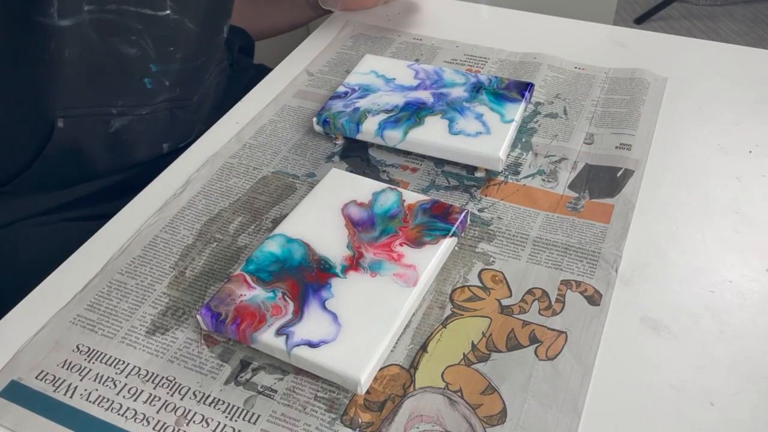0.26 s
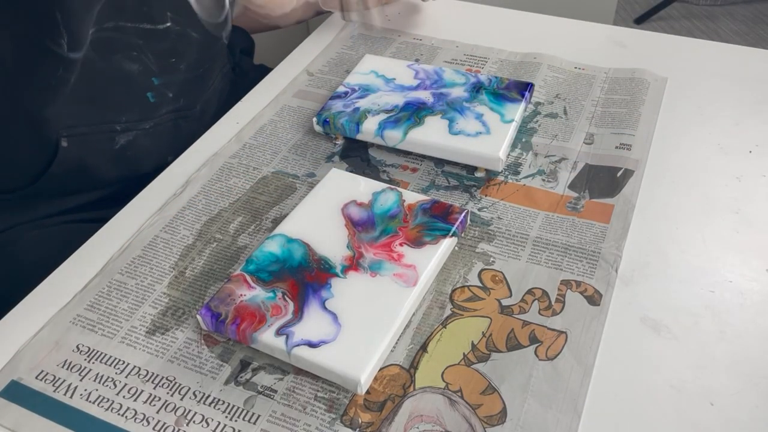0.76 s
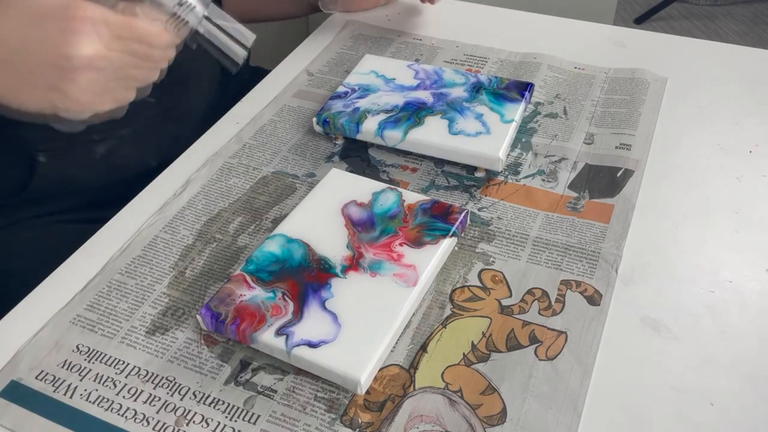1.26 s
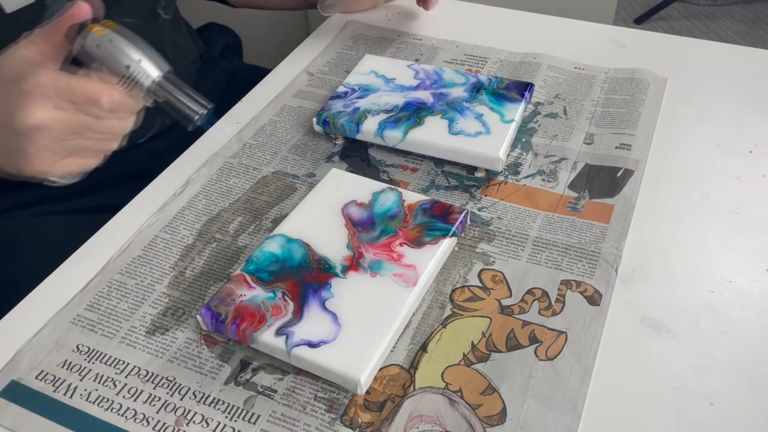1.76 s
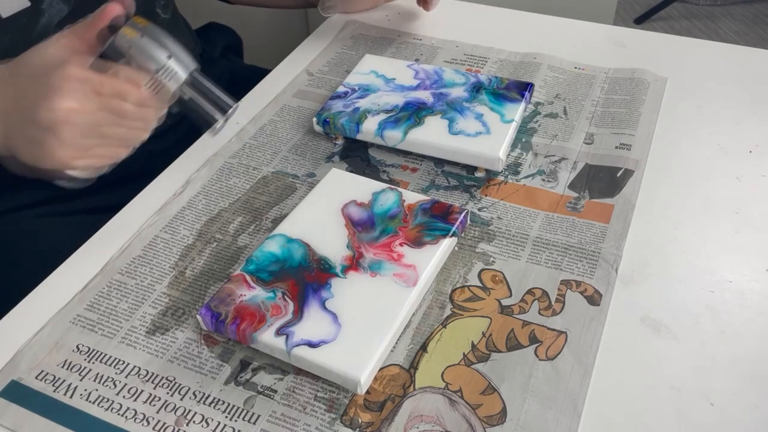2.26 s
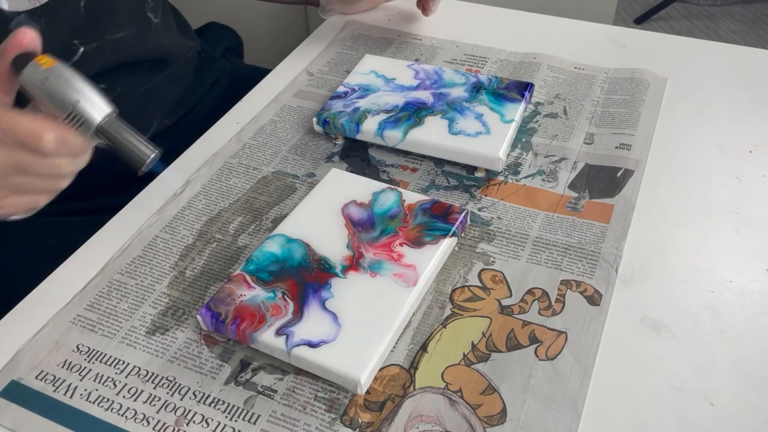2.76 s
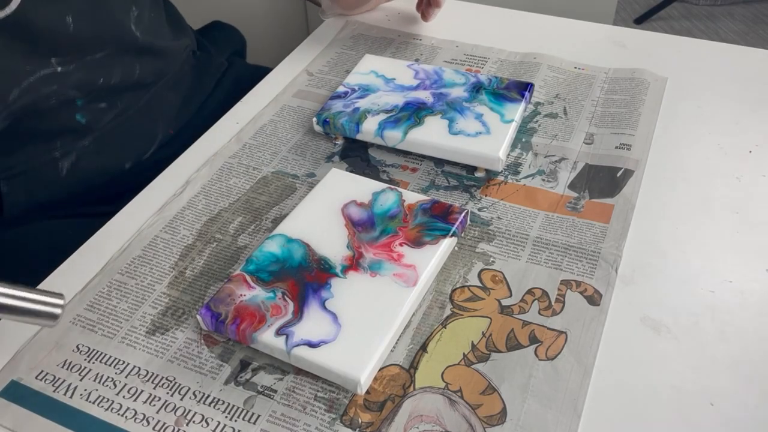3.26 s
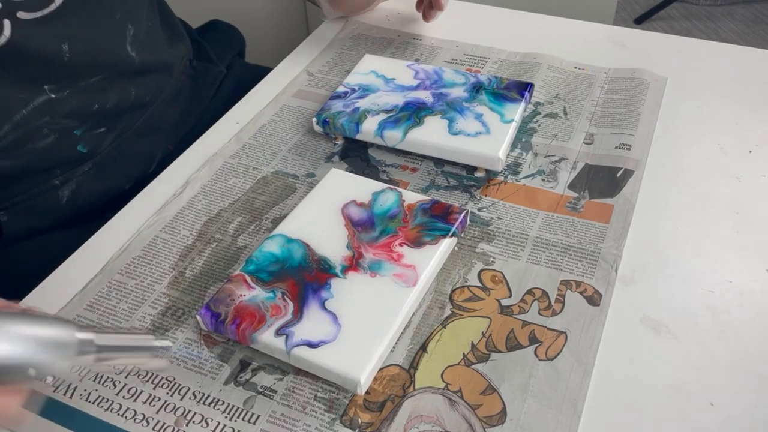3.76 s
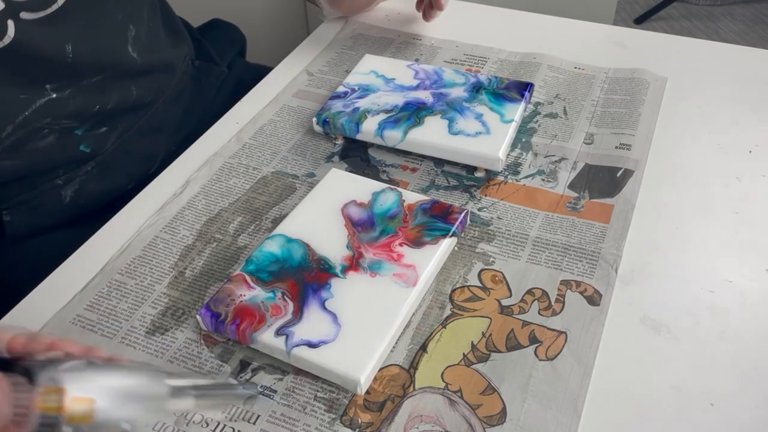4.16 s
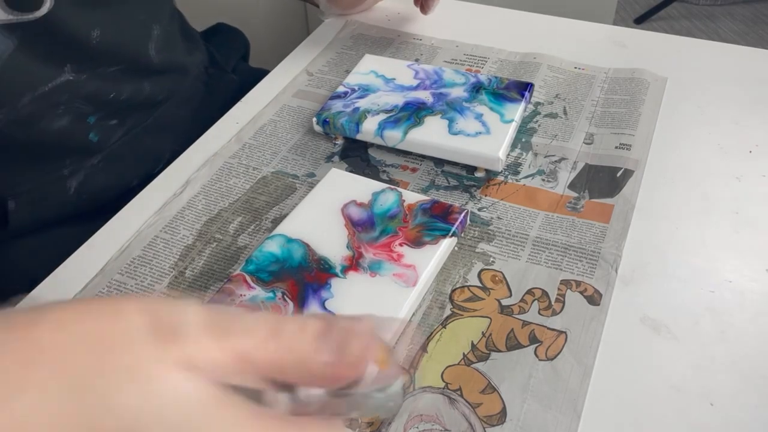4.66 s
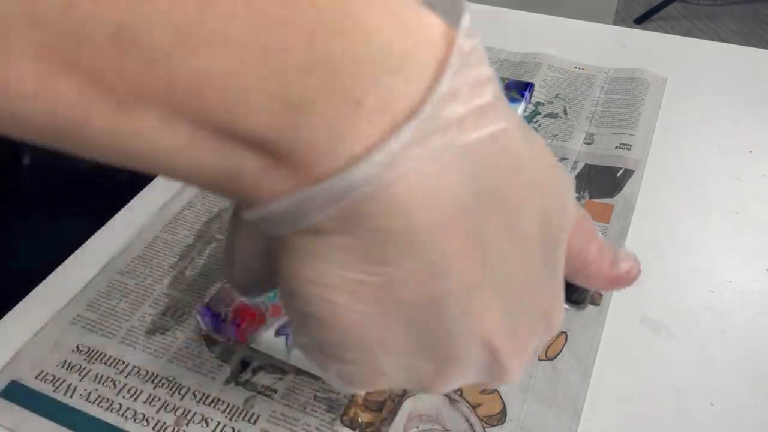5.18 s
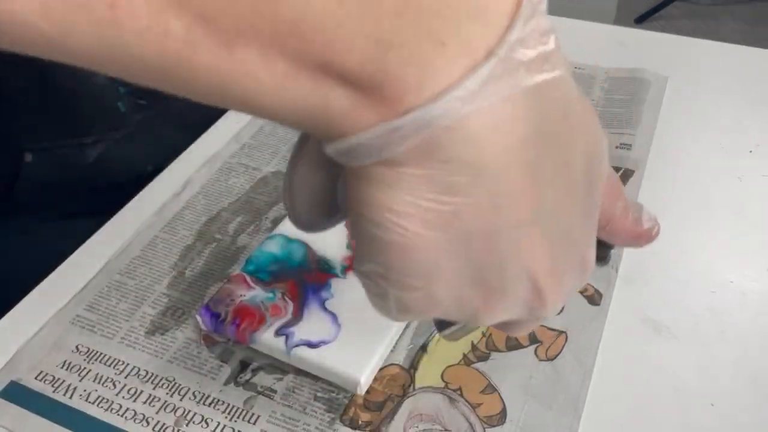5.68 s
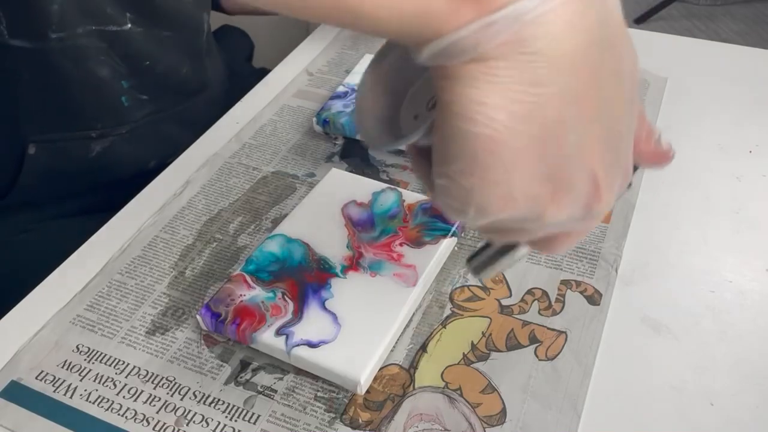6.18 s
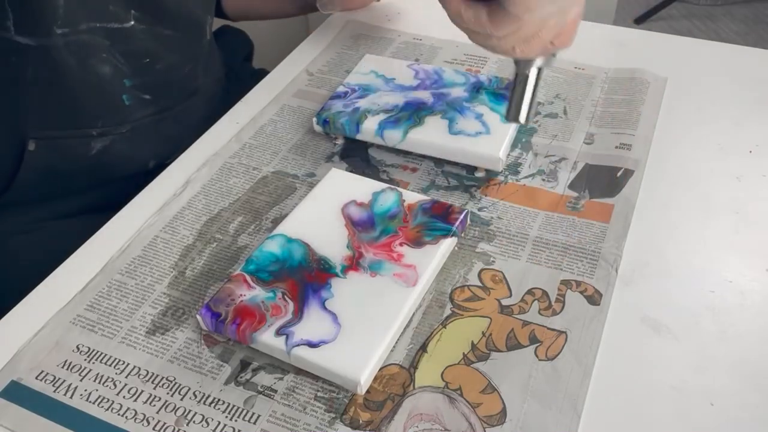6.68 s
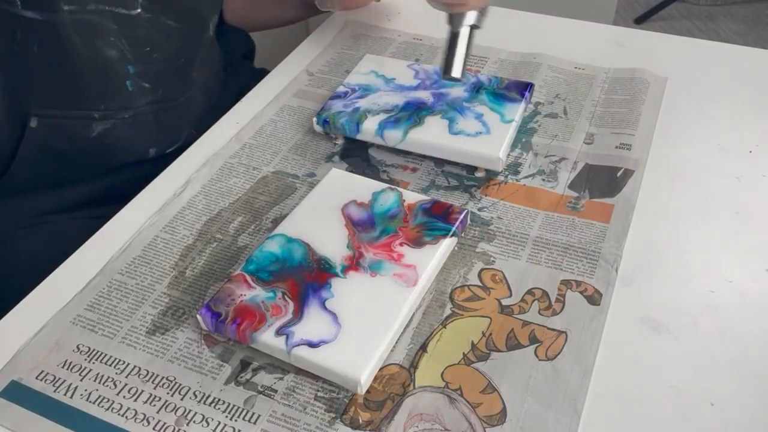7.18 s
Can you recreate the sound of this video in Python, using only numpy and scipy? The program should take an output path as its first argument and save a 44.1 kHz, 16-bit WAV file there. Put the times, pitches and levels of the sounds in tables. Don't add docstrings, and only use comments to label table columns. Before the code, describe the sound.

Handheld torch flame hisses in fluttering puffs, stops with small plastic ticks, then cracks back alight, four times over, with short room reverberation.

```python
import sys
import numpy as np
from scipy import signal
from scipy.fft import rfft, irfft, next_fast_len
from scipy.io import wavfile
from scipy.ndimage import uniform_filter1d, map_coordinates

SR = 44100
rng = np.random.default_rng(int(sys.argv[2]) if len(sys.argv) > 2 else 0)


def natural_amplitude(level_db):
    exponent = np.asarray(level_db, float) / 20
    return 10 ** exponent


def to_wav(sig):
    pcm = np.clip(np.atleast_2d(sig), -1, 1) * 32767
    pcm = np.round(pcm).astype(np.int16)
    wavfile.write(sys.argv[1], SR, pcm.T)


N = 327663

# (time [s], peak [dB], grip pitch [Hz], brightest pitch [Hz], top edge [dB])
SNAPS = [
    (1.5294, -2, 3000, 8550, -21),
    (3.326, -2.5, 2190, 7580, -13),
    (5.0008, -1, 1570, 10930, -16),
    (6.912, -2, 2250, 6540, -9.5),
]
# (frequency [Hz], width [Hz], level [dB])
GRIP = [(800, 2600, -8.5), (1860, 760, 2.5), (2250, 360, 3.5), (2860, 530, -2.5)]


def unit(x):
    return x / np.sqrt(np.mean(x ** 2) + 1e-20)


def along(points, hz):
    f, v = np.transpose(points)
    return np.interp(np.log(hz + 1), np.log(f + 1), v)


def wobble(rate):
    knots = rng.standard_normal(int(N * rate / SR) + 4)
    return map_coordinates(knots, [np.arange(N) * rate / SR])


def filtered(x, response):
    m = next_fast_len(N + SR // 2)
    return irfft(rfft(x, m) * response(np.fft.rfftfreq(m, 1 / SR)), m)[:N]


def resonant(x, modes):
    def response(f):
        total = 0
        for k, (centre, width, db) in enumerate(modes):
            damping = 1j * f * width
            total = total + (-1) ** k * natural_amplitude(db) * damping / (centre * centre - f * f + damping)
        return total
    return filtered(x, response)


def rush(spectrum, flutter_db, rate):
    turbulence = rng.standard_normal(N) * natural_amplitude(flutter_db * wobble(rate))
    return unit(filtered(turbulence, lambda hz: natural_amplitude(along(spectrum, hz))))


def gate(start, end, rise, fall):
    t = np.arange(N) / SR
    swell = 1 - np.exp(-np.clip(t - start, 0, 9) / rise)
    return swell * natural_amplitude(-60 * np.clip(t - end, 0, 9) / fall)


def played(laws, rise, fall):
    # (time [s], flame strength [dB], nozzle turned toward the microphone [dB])
    burns = [
        [(0, -45.5, 3), (.3, -43, 2.5), (.6, -44.5, 2.5), (.9, -44.5, 2)],
        [(1.75, -42, 0.5), (2.1, -42.5, -1), (2.5, -43, 0), (2.825, -40.5, -1.5)],
        [(3.55, -41, 0), (3.95, -42, 0.5), (4.37, -42, 0)],
        [(5.22, -41, 1.5), (5.7, -41.5, 0.5), (5.95, -40.5, -0.5), (6.53, -41.5, 2.5)],
        [(7.13, -42.5, 0.7), (7.43, -42, 3)],
    ]
    # (time [s], change [dB], half length [s])
    flares = [(0.027, 6, 0.035), (0.429, -4.5, 0.028), (0.465, 6.5, 0.029), (0.628, 4, 0.016),
              (0.72, -1, 0.028), (.778, 0, .02), (2.52, 1.5, 0.031), (2.805, -3, 0.023), (3.746, -2, 0.067),
              (5.831, 2, .05)]
    usual_db, drifts_per_s = -42, 9
    t = np.arange(N) / SR
    s, strength_db, turn_db = np.transpose(sum(burns, []))
    swing = np.interp(t, s, strength_db) - usual_db
    for at, db, half in flares:
        swing = swing + db * np.exp(-((t - at) / half) ** 2)
    starts = [-1] + [row[0] for row in SNAPS]
    lit = sum(gate(start, rows[-1][0], rise, fall) for start, rows in zip(starts, burns))
    turning = np.interp(t, s, turn_db)
    return [lit * natural_amplitude(usual_db + db + follows * swing + faces * turning + drift_db * wobble(drifts_per_s))
            for db, follows, faces, drift_db in laws]


def bursts(times, levels_db, t60s, rises, pitches_hz=None):
    out, t = np.zeros(N + SR), np.arange(SR // 4) / SR
    for k, (s, db, t60, rise) in enumerate(np.broadcast(times, levels_db, t60s, rises)):
        grit = rng.standard_normal(len(t))
        if pitches_hz is not None:
            slow = uniform_filter1d(grit + 0.37, size=40)
            grit = unit(slow * np.sin(2 * np.pi * pitches_hz[k] * t))
        shape = (1 - np.exp(-t / max(rise, 1e-4))) * natural_amplitude(db - 60 * t / max(t60, .002))
        out[round(s * SR):][:len(t)] += shape * grit
    return out[:N]


def blows(times, levels_db):
    out = np.zeros(N)
    out[np.round(times * SR).astype(int)] = natural_amplitude(levels_db)
    return out


def patchy(x, depth_db):
    z = signal.stft(x, nperseg=512)[2]
    field = uniform_filter1d(rng.standard_normal(z.shape), size=7, axis=0)
    field = uniform_filter1d(field, size=24, axis=1)
    return signal.istft(z * natural_amplitude(depth_db * unit(field)), nperseg=512)[1][:N]


def still_air():
    # (frequency [Hz], level per Hz [dB])
    murmur = [(12, -37.5), (20, -6.5), (65, -9.5), (96, -9.5), (187, -4.5), (590, -19), (1910, -19),
              (4180, -25.5), (8890, -29.5), (13200, -44.5), (14700, -39), (16000, -38)]
    return natural_amplitude(-66) * rush(murmur, flutter_db=1.2, rate=14)


def room(x):
    # (frequency [Hz], t60 [s])
    decay = [(150, 0.23), (700, 0.48), (2000, 0.47), (7000, 0.42), (14000, 0.29)]
    wet, step = np.zeros(N + SR), SR // 3
    for at in range(0, N, step):
        hz, t, z = signal.stft(rng.standard_normal(SR // 2), SR, nperseg=256)
        fade = natural_amplitude(-60 * t / along(decay, hz)[:, None])
        tail = signal.istft(z * fade, SR, nperseg=256)[1]
        answer = signal.fftconvolve(x[at:at + step], tail / np.linalg.norm(tail))
        wet[at:][:len(answer)] += answer
    return np.pad(wet, (260, 0))[:N]


def off_table(x):
    # (time [s], extra path [ms], share of the direct sound)
    path = [(0, 1.53, 0.28), (.45, 1.58, 0.23), (.9, 1.53, 0.13), (1.6, 1.61, 0.14), (2.85, 1.95, 0.1),
            (3.4, 4.3, 0.054), (4.4, 5.9, 0.1), (5.05, 2.44, 0.16), (6.1, 2.1, 0.18), (6.3, 1.97, 0.29),
            (6.95, 1.93, 0.16), (7.43, 2, .21)]
    s, path_ms, share = np.transpose(path)
    n = np.arange(N)
    lag = np.interp(n / SR, s, path_ms) * SR / 1e3
    share = np.clip(np.interp(n / SR, s, share), 0, .6)
    return (x + share * np.interp(n - lag, n, x)) / np.hypot(1, share)


def rings():
    # (time [s], pitch [Hz], level [dB], t60 [s], blur [Hz])
    tones = [(1.115, 5800, -67, 0.86, 130), (1.2, 4950, -69.5, 0.78, 216), (1.251, 1366, -58, .17, 185),
             (1.41, 5070, -65, .4, 900), (1.43, 1800, -57, 0.3, 240), (3.076, 2440, -44, 0.049, 250),
             (3.13, 2020, -50, .2, 200), (3.13, 4600, -61.5, .25, 200), (3.135, 6900, -65, .2, 300),
             (3.28, 4300, -60, .3, 250), (3.305, 2640, -54, .1, 150), (4.592, 1214, -57, 0.32, 25),
             (4.592, 3560, -51, .1, 40), (4.6, 2010, -58.5, 0.34, 171.3), (4.77, 8700, -77, .3, 400),
             (4.95, 1760, -55, .16, 278), (4.949, 3920, -54, 0.13, 277.8),
             (6.563, 1292, -33.5, 0.056, 138.9), (6.682, 4600, -55, 0.11, 27.78),
             (6.81, 2250, -53, 0.13, 40), (6.894, 2550, -45.5, 0.12, 138.9)]
    out, t = np.zeros(N + SR), np.arange(SR // 2) / SR
    for s, hz, db, t60, blur_hz in tones:
        drift = np.cumsum(rng.standard_normal(len(t))) * np.sqrt(2 * np.pi * abs(blur_hz) / SR)
        shape = natural_amplitude(db - 60 * t / t60) * (1 - np.exp(-t / (0.036 * t60)))
        out[round(s * SR):][:len(t)] += shape * np.sin(2 * np.pi * hz * t + drift)
    return out[:N]


def trigger():
    # (time [s], peak [dB], low knock [dB], ping [Hz])
    ticks = [(0.9073, -39, 0, 5770), (0.923, -38.5, 5, 4200), (1.316, -42, 2.5, 3800),
             (1.323, -44.5, -12, 8700), (1.4052, -25.5, -13, 4580), (2.851, -39, 1, 4410),
             (2.875, -44, 5, 3130), (2.9424, -51, 0.5, 4600), (3.05, -49, -6, 8600),
             (3.0661, -39, -9, 9130), (3.0724, -47.5, 5.5, 3700), (3.1216, -34, -4.5, 4650),
             (3.1774, -51, -2, 4700), (3.243, -46.5, -3, 8600), (4.382, -36, -6.5, 8600),
             (4.394, -40, 0, 4600), (4.42, -51, 2, 4300), (4.5431, -52.5, -1, 3890),
             (4.5886, -36, -4.5, 3610), (4.655, -55.5, 8, 3500), (4.7923, -48, -6, 3630),
             (6.537, -37, -20.5, 6900), (6.56, -36, 2.5, 3750), (6.6803, -35.5, -3.5, 4570),
             (6.6942, -46, 4.5, 8700), (6.8192, -49.5, -1, 3800)]
    # (frequency [Hz], width [Hz], level [dB])
    lever = [(4360, 1300, -2.5), (6900, 2200, -3.5), (8650, 790, 2), (13500, 4000, -16)]
    s, db, knock_db, ping_hz = np.transpose(ticks)
    t60 = 0.033
    rise = 0.00079 * natural_amplitude(np.clip(-db - 42, 0, 16))
    tick = resonant(bursts(s, db + 1.5, t60, rise), lever)
    tick += bursts(s, db - 14.5, 1.2 * t60, rise, ping_hz)
    knock = resonant(bursts(s + 0.001177, db + knock_db + 7.5, 1.36 * t60, 0.72 * rise), GRIP)
    spread = resonant(blows(s, db + 15.0), lever) + resonant(blows(s, db + knock_db + 24.0), GRIP)
    return tick + knock, spread


def cold_gas():
    # (valve opens [s], hiss at the spark [dB], swell [dB/s])
    openings = [
        (1.43, -58, 108),
        (3.282, -56, 102),
        (4.874, -58, 15),
        (6.856, -57, 130),
    ]
    # (frequency [Hz], level per Hz [dB])
    leak = [(1760, -64.5), (3000, -28), (3200, -38.5), (3570, -11), (4140, -2), (5800, -4.5), (6810, -3),
            (7830, -5), (9140, 4.5), (9600, -3), (10500, -10), (11400, -16), (13300, -10), (16000, -36.5)]
    t, flow = np.arange(N) / SR, 0
    for (opens, db, swell), snap in zip(openings, SNAPS):
        peak = snap[0] - 0.014
        valve = gate(opens - .012, peak, rise=0.016, fall=.063)
        flow = flow + valve * natural_amplitude(db + swell * np.clip(t - peak, -.2, 0))
    return natural_amplitude(3.5) * flow * rush(leak, flutter_db=.7, rate=200)


def jet():
    # (frequency [Hz], level per Hz [dB])
    low_hiss = [(1060, -6.5), (1800, -15.5), (1990, -0.5), (2160, 0.5), (2470, -2), (3750, -4.5),
                (4880, -47.5), (8250, -120)]
    barrel_hiss = [(2180, -23.5), (3700, -9.5), (4010, 0), (4520, 2), (5330, -4), (6900, -8.5),
                   (8970, -48.5), (15200, -120)]
    nozzle_hiss = [(4000, -36), (6800, -27.5), (7150, -13), (8160, -1.5), (8710, 2), (10200, -11),
                   (13700, -7), (14300, -11.5), (16000, -33)]
    laws = [(-14.5, 0.7, .4, -0.1), (-17.5, 0.86, .1, 1.5), (-15, 0.27, .1, -1.5)]
    low, barrel, whistle = played(laws, rise=0.027, fall=.16)
    near = off_table(low * rush(low_hiss, flutter_db=2.0, rate=120))
    near = near + barrel * rush(barrel_hiss, flutter_db=1.0, rate=50)
    near = near + whistle * rush(nozzle_hiss, flutter_db=1.0, rate=300)
    return natural_amplitude(-0.6) * patchy(near, depth_db=.9)


def flame():
    # (frequency [Hz], level per Hz [dB])
    rumble_noise = [(35, -52), (60, -33), (102, -31), (129, -9), (161, -8), (220, 1.5), (283, -2.5),
                    (323, 2), (380, -11), (490, -17), (840, -120)]
    roar_noise = [(210, -49), (360, -7.5), (464, -3), (502, -5), (545, -5.5), (594, -4.5), (689, -5.5),
                  (903, -6.5), (960, -13), (1250, -30), (2110, -120)]
    edge_noise = [(550, -39), (940, -3), (1240, -2.5), (1350, -5), (1850, -10), (2400, -51), (4070, -120)]
    # (frequency [Hz], width [Hz], level [dB])
    standing = [(136, 17, -3), (228, 22, -7.5), (323, 16, -15.5), (512, 14, 2), (604, 13, -9.5)]
    laws = [(-7.5, 0, 0.1, 2.5), (-1.72, 0.8, -0.5, 0.52), (-8, 1.34, 1, 0.5)]
    rumble, roar, edge = played(laws, rise=0.015, fall=0.084)
    puffs = natural_amplitude(-1.5 + .7 * wobble(25))
    low = rumble * rush(rumble_noise, flutter_db=1.0, rate=55)
    low = low + roar * rush(roar_noise, flutter_db=1.0, rate=160)
    low = low + sum(resonant(low, [mode]) for mode in standing)
    rough = edge * rush(edge_noise, flutter_db=1, rate=120)
    return natural_amplitude(-1.0) * puffs * off_table(low + rough)


def igniter():
    # (frequency [Hz], width [Hz], level [dB])
    shell = [(4360, 1300, -4), (6210, 750, 1.5), (8800, 1400, 1.5), (11300, 500, -5), (14000, 1500, 1.5),
             (14030, 300, -3)]
    cap = [(14100, 1800, -0.5)]
    tank = [(133.3, 39, -2.5), (221, 53, 1.5), (45, 180, -18.5)]
    roomward = [(4600, 1000, -6), (6690, 570, 1.5), (8950, 930, -2.5), (11200, 1500, -7),
                (14200, 3200, -8.5)]
    s, db, grip_hz, bright_hz, edge_db = np.transpose(SNAPS)
    grip_db = db - 21
    crack = bursts(s - .0003, db + 3, 0.01, 0.001)
    crack += bursts(s + 0.0033, db - 10, 0.032, 0.0019)
    knock = bursts(s - .0003, grip_db + 16, 0.028, 0.0018)
    ping = bursts(s, db - 3.5, 0.0085, 0.0011, bright_hz)
    ping += resonant(bursts(s, db + edge_db + 11.5, 0.017, 0.00092), cap)
    ping += bursts(s, grip_db + 5.5, 0.0092, .0008, grip_hz)
    push, t = np.zeros(N), np.arange(N) / SR
    for at, level in zip(s + .0002, db - 7.5):
        push -= natural_amplitude(level) * np.exp(-((t - at) / 0.00038) ** 2)
    thump = resonant(push, tank)
    spread = resonant(blows(s, db + 11.5), roomward) + resonant(blows(s, grip_db + 29.5), GRIP)
    spread += natural_amplitude(-3.0) * thump
    return resonant(crack, shell) + resonant(knock, GRIP[1:]) + ping + thump, spread


def scene():
    snap, snap_spread = igniter()
    tick, tick_spread = trigger()
    gas = flame() + jet() + cold_gas() + rings()
    answer = room(natural_amplitude(-5) * gas + snap_spread + tick_spread)
    return (gas + snap + tick + answer + still_air())[None]


def band_limit(x):
    return signal.sosfilt(signal.butter(12, 16820, fs=SR, output="sos"), x)


def record(dry):
    top_hz = 15850
    hissy = dry[0] + natural_amplitude(-76.0) * rng.standard_normal(N)
    dulled = filtered(hissy, lambda hz: 1 / (1 + (hz / top_hz) ** 300))
    finished = dulled - .0005
    return band_limit(finished[None])


dry = scene()
out = record(dry)
to_wav(out)
```